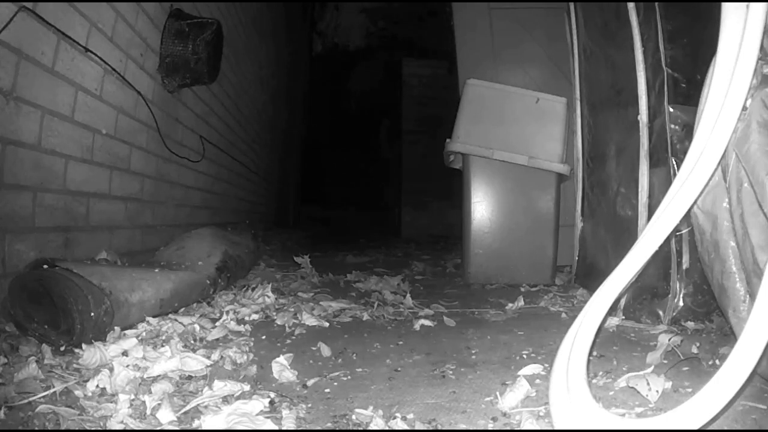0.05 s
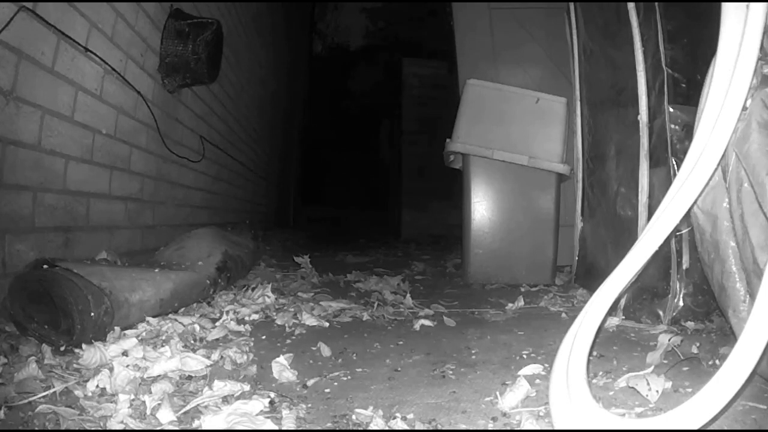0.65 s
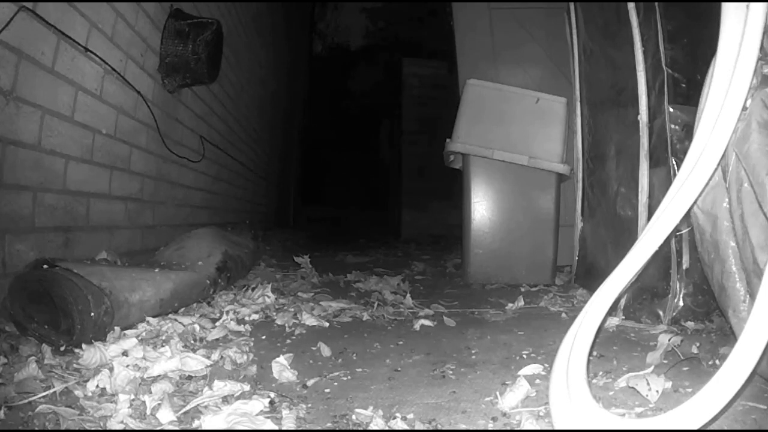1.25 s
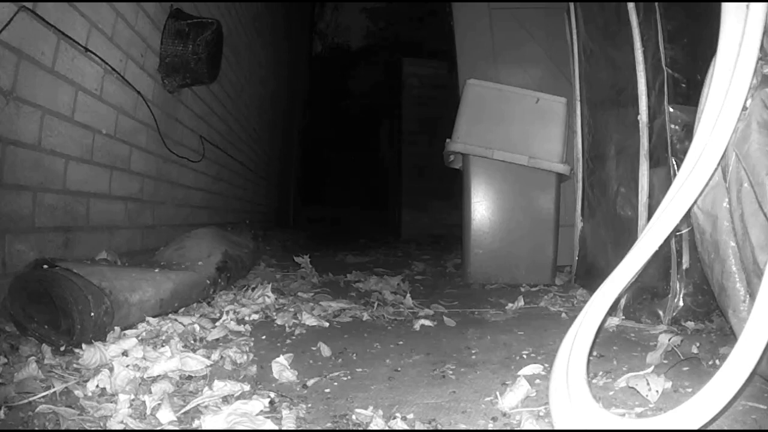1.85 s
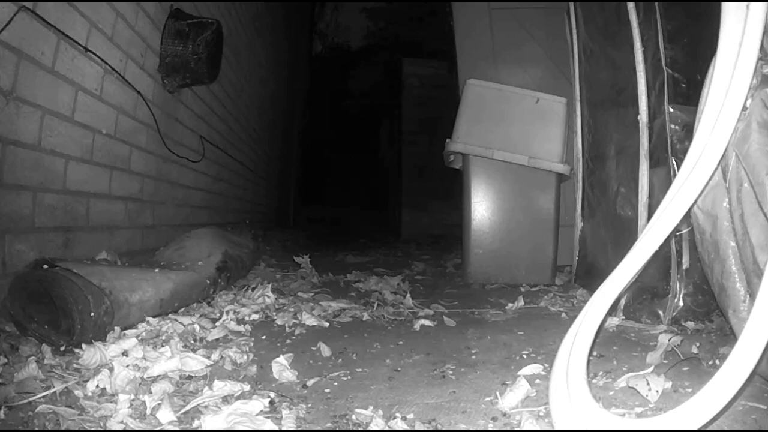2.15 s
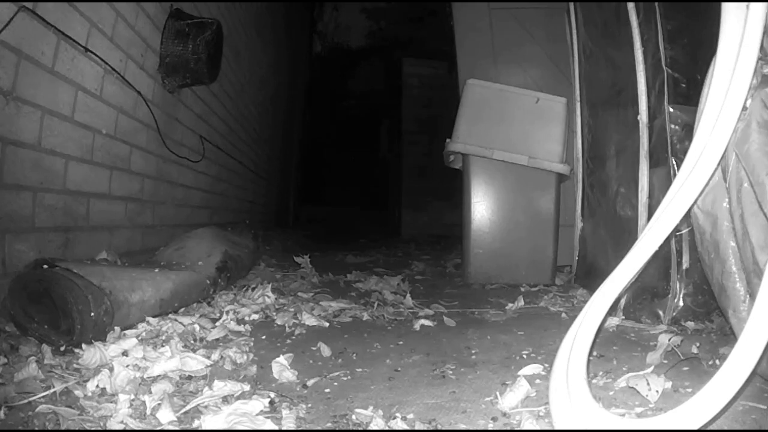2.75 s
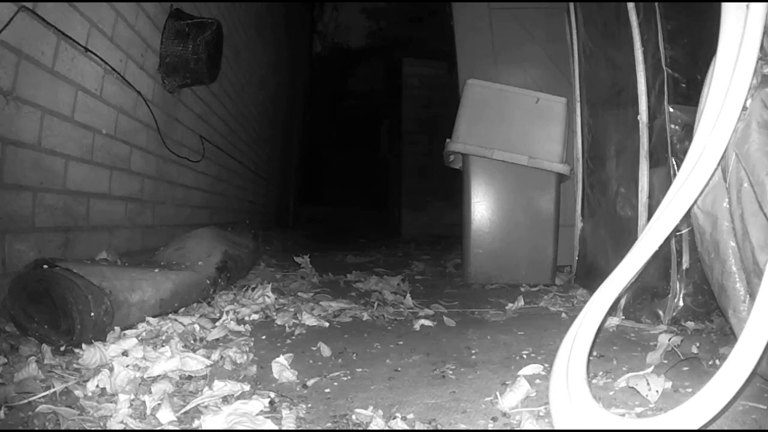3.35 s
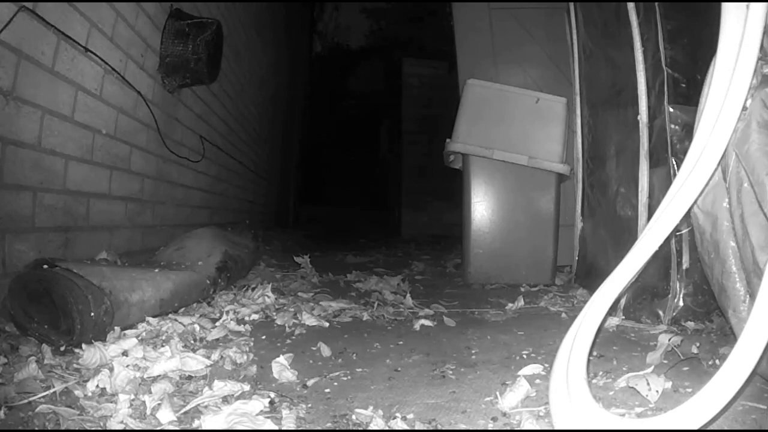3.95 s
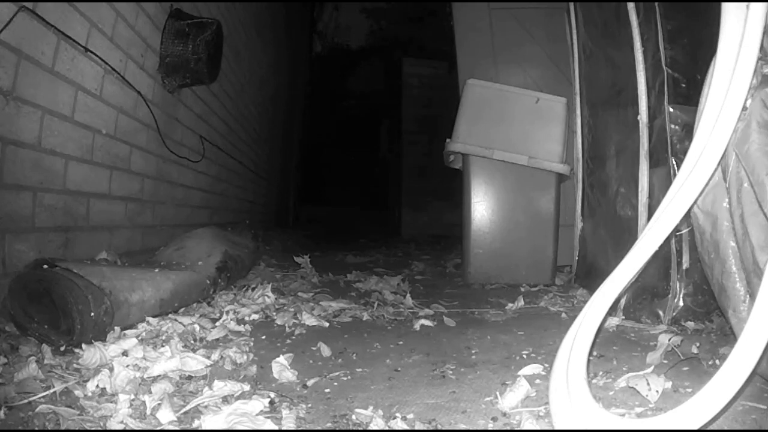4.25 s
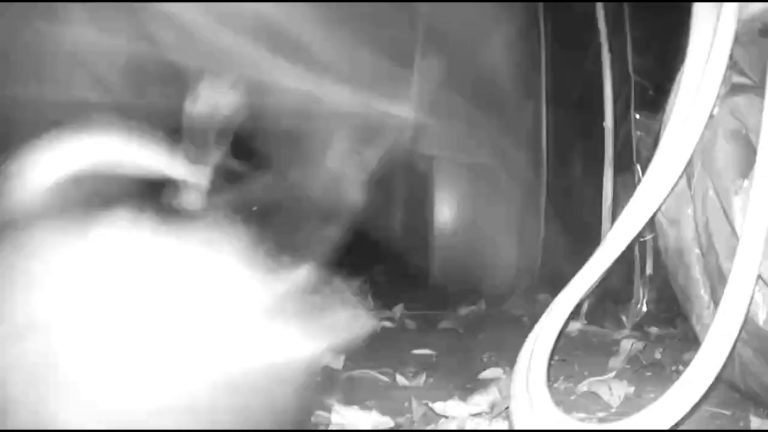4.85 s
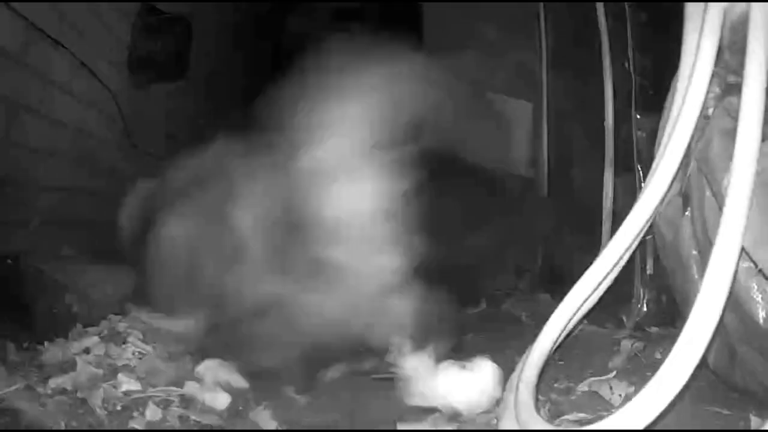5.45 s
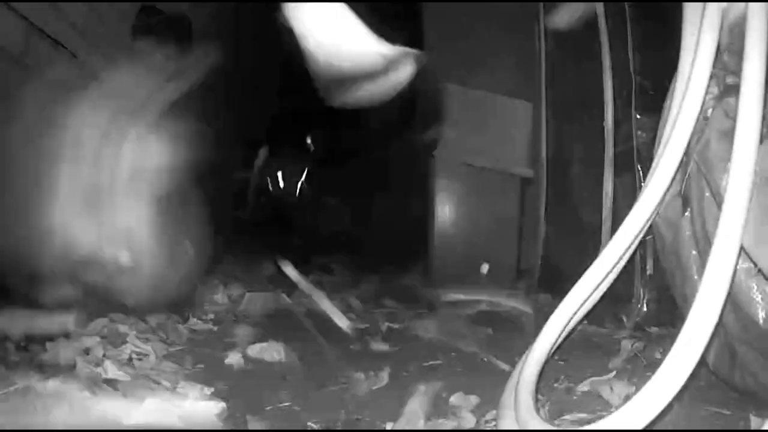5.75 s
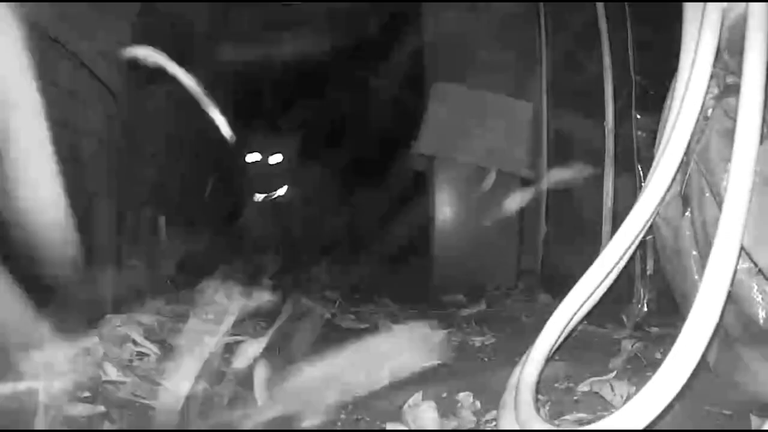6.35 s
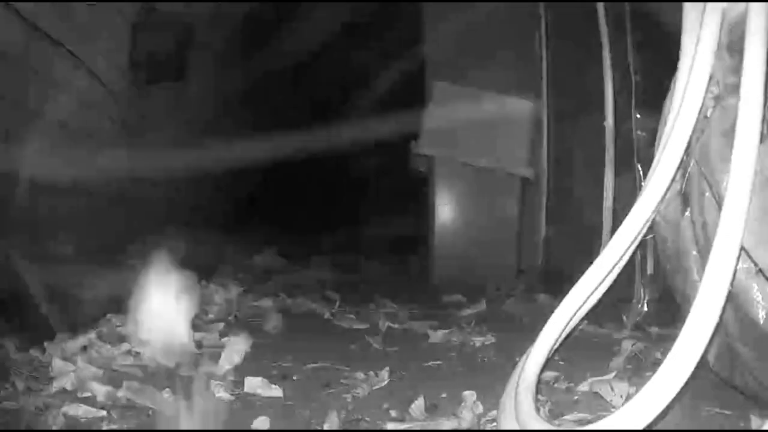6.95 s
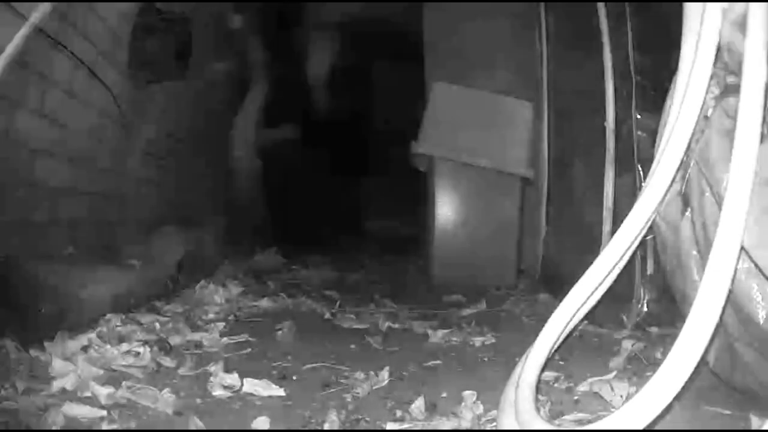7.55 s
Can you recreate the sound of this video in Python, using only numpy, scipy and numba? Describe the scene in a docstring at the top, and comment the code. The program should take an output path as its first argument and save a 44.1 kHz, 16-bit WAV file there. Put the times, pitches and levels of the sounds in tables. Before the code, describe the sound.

A cat's long yowl rises and sinks, then a fight erupts with a distorted shriek, a snarl, thrashing dry leaves and thumps on the microphone.

```python
"""A cat's long yowl rises and sinks as it faces another cat in a brick passage at night.
Vocal folds supply the harmonics; the opening mouth, a variable filter, makes them louder and brighter.
The small security camera that hears it mutes briefly, then a shriek (irregular fold vibration) and a
snarl (low pulses) overload its microphone. The cats thrash through dry leaves, which crackle as they
fracture, and bump the camera, whose mount and case ring in their modes over a faint hiss."""
import sys
import numpy as np
from scipy import signal
from scipy.fft import rfft, irfft
from scipy.io import wavfile
from scipy.ndimage import uniform_filter1d
from numba import njit

SR = 44100
rng = np.random.default_rng(int(sys.argv[2]) if len(sys.argv) > 2 else 0)


def materialize(psi):
    """Save the field psi as 16-bit PCM at rate SR to the path in sys.argv[1].

    A 1-D psi becomes a single channel; in a 2-D psi each row is a channel.
    """
    bounded = np.clip(np.atleast_2d(psi).T, -1, 1)
    quanta = np.round(bounded * 32767).astype(np.int16)
    wavfile.write(sys.argv[1], SR, quanta)


N = 339570
T = np.arange(N) / SR


def undb(db):
    """Decibels to amplitude ratio."""
    return 10 ** (np.asarray(db) / 20)


def unit(x):
    """Normalisation to rms 1."""
    return x / np.sqrt(np.mean(x ** 2) + 1e-20)


def curves(table):
    """Linear interpolation of each column over time."""
    times, *columns = np.transpose(table)
    return [np.interp(T, np.sort(times), column) for column in columns]


def during(table):
    """A soft-edged gate, open from a table's first row to its last."""
    return uniform_filter1d(1. * ((T > table[0][0] - .002) & (T < table[-1][0])), size=60)


def shape_db(hz, points):
    """A spectral envelope interpolated over log frequency."""
    points_hz, db = np.transpose(points)
    return np.interp(np.log(hz + 1), np.log(points_hz), db)


def colour(x, points):
    """Filtering by a spectral envelope, to rms 1."""
    return unit(irfft(rfft(x) * undb(shape_db(np.fft.rfftfreq(N, 1 / SR), points)), N))


def walk(rate_hz):
    """Smooth random modulation with a spread near 1."""
    step = max(int(SR / rate_hz), 1)
    points = rng.standard_normal(N // step + 2)
    return 1.3 * uniform_filter1d(np.interp(T * SR / step, np.arange(len(points)), points), step)


@njit
def bandpass(x, hz, width_hz):
    """A state-variable filter with a moving centre and a peak gain of 1."""
    y, band, low = np.empty(len(x)), 0., 0.
    for i in range(len(x)):
        g, damping = np.tan(np.pi * hz[i] / SR), width_hz / hz[i]
        v = (band + g * (x[i] + 1e-18 - low)) / (1 + g * (g + damping))
        band, low, y[i] = 2 * v - band, low + 2 * g * v, damping * v
    return y


def resonate(x, hz, width_hz):
    """A damped resonator that preserves the power of white noise."""
    centre_hz = np.minimum(hz, SR / 3) * np.ones(len(x))
    return bandpass(x, centre_hz, float(width_hz)) * np.sqrt(SR / np.pi / width_hz)


def ring(force, modes):
    """Modal superposition: a driven body responds as the sum of its resonances."""
    power = sum(undb(db) ** 2 for _, _, db in modes)
    return sum(undb(db) * resonate(force, hz, width) for hz, width, db in modes) / np.sqrt(power)


def burst(t, peak_s, rise_s, decay_s):
    """Exponential growth to a peak, then exponential decay."""
    return np.exp(-np.minimum(np.maximum((peak_s - t) / rise_s, (t - peak_s) / decay_s), 40))


# background spectrum: frequency_hz, level_db
NIGHT_SPECTRUM = [(20, 0), (40, -0.5), (110, -4), (250, -12), (500, -18.5), (750, -14), (1450, -23),
                  (2270, -19), (2560, -26), (3300, -20.5), (5200, -22.5), (7400, -27), (9000, -41.5)]

def night_hiss(level_db=-58.5):
    """Stationary coloured noise, strongest in the bass."""
    return colour(rng.standard_normal(N), NIGHT_SPECTRUM) * undb(level_db)


def passage(x, t60_s, wet_db):
    """Reverberation: scattered reflections between brick walls decay exponentially."""
    t = T[:SR // 2]
    tail = rng.standard_normal(len(t)) * undb(-60 * t / t60_s) * (t > .005)
    return x + undb(wet_db) * signal.fftconvolve(x, tail / np.linalg.norm(tail))[:N]


# modes of the camera case: frequency_hz, bandwidth_hz, level_db
CASE_MODES = [(500, 60, -5), (706, 97, 5), (772, 53, 5), (875, 34, -6.5), (1015, 43, -16.5),
              (1510, 360, -7.5), (1974, 81, -6), (2970, 140, -15), (3850, 500, -22)]

def camera_case(force):
    """Forced vibration: the small shell rings in its midrange modes."""
    return ring(force, CASE_MODES)


# sharp cracks and knocks on or near the camera: peak_s, case_db, crack_db, decay_s, air_db
SHARP_KNOCKS = [(6.8149, -16, 2.5, 0.004, -8), (7.3415, -10, -23, 0.0023, -32),
                (7.401, -44, -35, 0.0023, -43)]

def knocks(crack_hz=2300, crack_width_hz=1500, push_s=0.0051):
    """Impact excitation on or near the camera: a crack, some ringing of the case and a push of air."""
    force, crack, air = 0, 0, 0
    for peak_s, case_db, crack_db, decay_s, air_db in SHARP_KNOCKS:
        contact = burst(T, peak_s, 0.000056, decay_s)
        force += undb(case_db) * contact
        crack += undb(crack_db) * contact
        air -= undb(air_db) * np.exp(-np.minimum(((T - peak_s - push_s) / push_s) ** 2, 40))
    grain = rng.standard_normal(N)
    return camera_case(force * grain) + resonate(crack * grain, crack_hz, crack_width_hz) + air


# modes of the mount: frequency_hz, bandwidth_hz, level_db
MOUNT_MODES = [(54.5, 8.9, 1.5), (95.5, 21, 8.5), (143.4, 13, -0.5), (192, 120, -18)]
# bodies striking the mount: peak_s, boom_db, rattle_db, decay_s
MOUNT_BUMPS = [(4.969, -13.5, -46, 0.11), (5.449, -35.5, -41, 0.027), (5.881, -43.5, -25.5, .013),
               (6.343, -7.5, -5, 0.019), (6.367, -8.5, -28.5, 0.059), (6.418, -13.5, -20, .04),
               (6.505, -26, -43, 0.091), (6.655, -47, -37.5, 0.018), (7.035, -22, -19.5, .008),
               (7.051, -3, -8, 0.021), (7.098, -4.5, -14, 0.025), (7.171, -13.5, -51, 0.016),
               (7.202, -16, -38.5, .055), (7.302, -28, -55, 0.12), (7.447, -35, -60, 0.11),
               (7.591, -34.5, -60.5, 0.036)]

def bumps(chatter_db=5, drag=0.86, shove_db=-3):
    """Impulse and friction: each blow and its dragging fur drive the low modes; the case chatters."""
    push, shove, rattle = 0, 0, 0
    for peak_s, boom_db, rattle_db, decay_s in MOUNT_BUMPS:
        contact = burst(T, peak_s, 0.0018, decay_s)
        push += undb(boom_db) * contact
        rattle += undb(rattle_db) * contact
        shove += undb(boom_db + shove_db) * burst(T, peak_s + 0.0031, 0.00044, 0.0018) / 2
    boom = ring(shove + drag * push * rng.standard_normal(N), MOUNT_MODES)
    boom = signal.sosfilt(signal.butter(3, 300, fs=SR, output="sos"), boom)
    chatter = unit(rng.standard_normal(N) * undb(chatter_db * walk(250)))
    case = camera_case(rattle * chatter)
    return boom + signal.sosfilt(signal.butter(2, 3500, fs=SR, output="sos"), case)


def crunch(grit, peak_s, db, rise_s, decay_s, hz, width_hz=4500):
    """A noise transient: a crushed leaf radiates one broadband burst."""
    span = (T > peak_s - 6 * rise_s) & (T < peak_s + 8 * decay_s)
    envelope = undb(db) * burst(T[span], peak_s, rise_s, decay_s)
    sound = np.zeros(N)
    sound[span] = envelope * unit(resonate(grit[span], hz, width_hz))
    return sound


# spectrum of dry leaves: frequency_hz, level_db
LEAF_SPECTRUM = [(150, 0.5), (400, -0.5), (900, -4.5), (1400, -4), (2200, 1), (3000, -2.5), (4400, 0.5),
                 (6300, -0.5), (7500, -3), (9000, -13.5)]
# strength of the thrashing: time_s, level_db
THRASHING = [(4.97, -30.5), (5.38, -25.5), (5.48, -28.5), (5.64, -27.5), (5.78, -29), (5.84, -37),
             (5.92, -29.5), (6.43, -25.5), (6.61, -34.5), (6.92, -42), (6.97, -46.5), (7.1, -38),
             (7.7, -54)]
# paws scraping through leaves: peak_s, level_db, decay_s
PAW_SCRAPES = [(5.428, -27, 0.017), (5.536, -16.5, 0.023), (5.594, -16, 0.0055), (5.755, -25, 0.075),
               (5.891, -27.5, 0.013), (5.939, -23.5, 0.051), (6.478, -19, 0.013), (6.802, -25, .012),
               (6.887, -24.5, 0.03), (7.099, -28, 0.01), (7.529, -37.5, 0.019)]
# single leaves snapping: peak_s, level_db, centre_hz
LEAF_SNAPS = [(5.757, -14.5, 5500), (5.9903, -6, 3780), (6.572, -20, 5500), (6.639, -23.5, 5000),
              (6.68, -14.5, 5560), (6.783, -22, 6000), (6.816, 3, 6400), (6.8789, -9.5, 3900),
              (7.224, -25.5, 7000), (7.372, -28, 5460)]

def leaves(grain_db=2.0, surge_db=2.5, bed_db=-1, ticks_per_s=60, tick_db=1, tick_spread_db=5,
           scrape_hz=4110, snap_rise_s=0.00036, snap_decay_s=0.0013):
    """Brittle fracture: many tiny breaks merge into crackle; larger ones stand out from it."""
    level_db, = curves(THRASHING)
    grains = np.repeat(rng.exponential(size=N // 30 + 1), 30)[:N]
    sizes = undb(grain_db * np.minimum(grains, 5))
    crackle = colour(sizes * rng.standard_normal(N), LEAF_SPECTRUM)
    grit = colour(rng.standard_normal(N) * np.sqrt(sizes), LEAF_SPECTRUM)
    breaks = (rng.random(N) < ticks_per_s / SR) * undb(tick_db + tick_spread_db * rng.standard_normal(N))
    ticks = grit * signal.lfilter([1], [1, -np.exp(-1 / (snap_decay_s * SR))], breaks)
    bed = (crackle * undb(bed_db + surge_db * walk(70)) + ticks) * undb(level_db) * (T > MUTE_START_S)
    scrapes = sum(crunch(grit, s, db, 0.54 * decay, decay, scrape_hz) for s, db, decay in PAW_SCRAPES)
    snaps = sum(crunch(grit, s, db, snap_rise_s, snap_decay_s, hz) for s, db, hz in LEAF_SNAPS)
    return bed + scrapes + snaps


# one gesture per snarl: time_s, level_db, mouth_hz, upper_resonance_db
SNARL_GESTURES = [
    [(5.32, -24, 1570, -10), (5.35, -28.5, 1090, -14), (5.405, -28, 1129, -19)],
    [(5.985, -27, 1320, -11), (6.048, -28, 1510, -18), (6.068, -15, 1570, -24.5), (6.11, -21, 1450, -7.5),
     (6.15, -16, 1510, 0), (6.185, -7, 1480, -1.5), (6.23, 6.5, 1230, -11.5), (6.305, 0.5, 1000, -11.5),
     (6.335, -20, 970, -7.5), (6.4, -36, 780, -11)],
]

def snarl(gesture, jitter=.04, mouth_width_hz=300, upper_width_hz=800, chest_db=-11, turbulence=0.9):
    """Pulse excitation: uneven glottal pulses and turbulent puffs drive a closing mouth's formants."""
    level_db, mouth_hz, upper_db = curves(gesture)
    rate_hz = 205 + 1.3 * level_db  # faster with effort
    upper_hz = 1450 + 0.67 * mouth_hz
    cycles = np.cumsum(rate_hz * (1 + jitter * walk(200))) / SR
    pulses = unit(np.diff(np.floor(cycles), prepend=0) * undb(2 * walk(200)))
    puffs = unit(np.exp(-3 * (cycles % 1)) * rng.standard_normal(N))
    source = pulses + turbulence * puffs
    mouth = unit(resonate(resonate(source, mouth_hz, mouth_width_hz), mouth_hz, 2100))
    upper = unit(resonate(resonate(source, upper_hz, upper_width_hz), upper_hz, 420))
    chest = undb(chest_db) * resonate(pulses, 576, 490)
    voice = (mouth + undb(upper_db) * upper + chest) / np.sqrt(1 + undb(upper_db) ** 2)
    return voice * undb(level_db) * during(gesture)


# melody of the shriek: time_s, pitch_hz
SHRIEK_PITCH = [(4.967, 1127), (5.05, 1131), (5.075, 1172), (5.1, 1131), (5.128, 978.5), (5.165, 982),
                (5.215, 1141), (5.234, 924), (5.248, 1067), (5.263, 949), (5.298, 1020), (5.334, 812)]
# harmonics and the subharmonic lines between them: pitch_multiple, level_db
SHRIEK_LINES = [(.5, -23), (1, -11.5), (1.5, -8.5), (2, -3.5), (2.5, -7), (3, -22), (4, -48)]

def shriek(jitter=.04, wobble=.013, rasp=0.66, air_db=-12, hold_s=0.32, fade_db_per_s=556,
           break_s=5.099):
    """Period doubling and chaos: a high scream breaks into a rasp as its half-pitch lines grow."""
    pitch_hz, = curves(SHRIEK_PITCH)
    level_db = 5 - fade_db_per_s * np.maximum(T - SHRIEK_PITCH[0][0] - hold_s, 0)
    roughness = np.interp(T, [break_s, break_s + 0.0049], [.24, 0.55]) * undb(0.75 * walk(70))
    waver = 1 + wobble * walk(70) + jitter * (0.2477 + roughness) * walk(500)
    phase = 2 * np.pi * np.cumsum(pitch_hz * waver) / SR
    voice = 0
    for k, db in SHRIEK_LINES:
        share = 1 if k == 2 else roughness  # the strongest partial sits on the mouth resonance
        voice += undb(db) * share * np.sin(k * phase) * (1 + rasp * roughness * walk(600))
    air = undb(air_db) * np.sqrt(roughness) * resonate(rng.standard_normal(N), 2 * pitch_hz, 740)
    return (np.sqrt(2) * voice + air) * undb(level_db) * during(SHRIEK_PITCH)


# melody of the yowl: time_s, pitch_hz
YOWL_PITCH = [(0.02, 357.5), (0.23, 318), (0.53, 280), (0.89, 272.7), (1.21, 303), (1.35, 405),
              (1.65, 480.8), (1.76, 468.6), (2.12, 457), (2.35, 421.8), (2.64, 385.6), (3.02, 350.5),
              (3.66, 344), (4.0, 332), (4.27, 298), (4.53, 291.6), (4.69, 271)]
# movement of the mouth: time_s, opening_fraction, resonance_hz
YOWL_MOUTH = [(0, 0, 365), (1.15, 0, 453), (1.27, 0.13, 1100), (1.42, 0.55, 1680), (1.62, .72, 2070),
              (1.74, 0.93, 2336), (1.94, 0.97, 2240), (2.14, 0.93, 1850), (2.22, 0.64, 1800),
              (2.38, 0.61, 1230), (2.6, 0.53, 1180), (2.655, 0.21, 1053), (3.95, 0.12, 1110),
              (4.5, 0, 1162), (4.62, .05, 854)]
# vocal tract spectra, mouth shut and wide open: frequency_hz, level_db
SHUT_SPECTRUM = [(280, 1), (600, -2.5), (900, -9), (1200, -11), (1500, -18.5), (1900, -21.5), (2280, -19),
                 (2600, -38.5), (3300, -29.5), (3750, -24), (4100, -39.5), (8000, -39.5)]
OPEN_SPECTRUM = [(450, -21), (900, -14.5), (1400, -4.5), (2000, 6), (2350, -0.5), (2780, -8.5), (3300, -2),
                 (3750, -5), (4150, -7), (4700, -2.5), (5400, -6), (6600, -10), (7400, -24), (8200, -28)]
# dips where the voice falters: centre_s, depth_db, half_length_s
YOWL_FALTERS = [(0, 4, .12), (2.515, 10, 0.022), (2.88, 9, .05)]

def yowl(jitter=.002, mouth_width_hz=300, upper_width_hz=330, upper_db=14, nasal_db=15, flutter_db=0.97,
         shut_db=-57.5, open_gain_db=25, closing_s=2.134, closing_length_s=0.17):
    """Source and filter: the opening mouth raises the formants and radiates the harmonics more fully."""
    pitch_hz = uniform_filter1d(curves(YOWL_PITCH)[0], size=2200)
    opening, mouth_hz = curves(YOWL_MOUTH)
    closing = np.clip((T - closing_s) / closing_length_s, 0, 1)
    mouth_db = 15 * (0.49 + np.minimum(opening * 2, .85))
    upper_hz = np.interp(opening, [0, 1], [2300, 3520])
    nasal_hz = 11.1 * pitch_hz  # this overtone takes over as the mouth closes
    level_db = shut_db + open_gain_db * opening ** 1.53
    level_db -= sum(db * np.exp(-((T - s) / length) ** 2) for s, db, length in YOWL_FALTERS)
    # the voice catches while the pitch is pushed up
    octaves_per_s = uniform_filter1d(np.gradient(np.log2(pitch_hz)) * SR, size=4000)
    catch = .012 * np.clip(octaves_per_s, 0, 1) * walk(160)
    pitch_hz *= 1 + jitter * walk(45) + catch
    phase = 2 * np.pi * np.cumsum(pitch_hz) / SR
    voice, power = 0, 0
    for k in range(1, 18):
        hz = k * pitch_hz
        db = (1 - opening) * shape_db(hz, SHUT_SPECTRUM) + opening * shape_db(hz, OPEN_SPECTRUM)
        db += mouth_db / (1 + ((hz - mouth_hz) / mouth_width_hz) ** 2)
        db += upper_db * (1 - closing) / (1 + ((hz - upper_hz) / upper_width_hz) ** 2)
        db += nasal_db * closing / (1 + ((hz - nasal_hz) / upper_width_hz) ** 2)
        # wall reflections make each harmonic fade on its own, the high ones most
        fading_db = (1.44 + 2.4 * opening * hz / 4000) * walk(14)
        gain = undb(db + fading_db)
        voice += gain * np.sin(k * phase)
        power += gain ** 2 / 2
    return voice / np.sqrt(power) * undb(level_db + flutter_db * walk(40)) * (T < MUTE_START_S)


def scene():
    """Superposition: the yowl down the passage, the fight at the camera and faint night hiss."""
    far = passage(yowl(), t60_s=.15, wet_db=-12)
    cries = shriek() + sum(snarl(gesture) for gesture in SNARL_GESTURES)
    near = passage(cries, t60_s=0.098, wet_db=-9.5)
    return (night_hiss() + far + near + leaves() + bumps() + knocks())[None]


MUTE_START_S, MUTE_END_S = 4.698, 4.9668

def record(dry, ceiling=0.4, treble_hz=7700, cutoff_hz=8600):
    """Saturation and band limiting: the camera mutes briefly, clips hard and loses the high treble."""
    live = dry * ((T < MUTE_START_S) | (T > MUTE_END_S))
    oversampled = signal.resample_poly(live, 4, 1, axis=1)
    clipped = signal.resample_poly(np.clip(oversampled, -ceiling, ceiling), 1, 4, axis=1)
    centred = signal.sosfilt(signal.butter(1, 9, "high", fs=SR, output="sos"), clipped)
    dulled = irfft(rfft(centred) / np.sqrt(1 + (np.fft.rfftfreq(N, 1 / SR) / treble_hz) ** 22), N)
    return signal.sosfilt(signal.ellip(8, .2, 70, cutoff_hz, fs=SR, output="sos"), dulled)


dry = scene()
out = record(dry)
materialize(out)
```